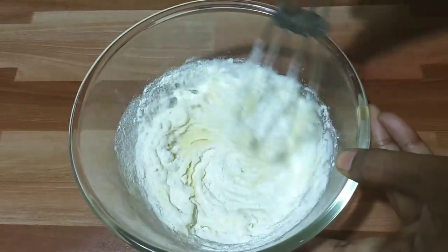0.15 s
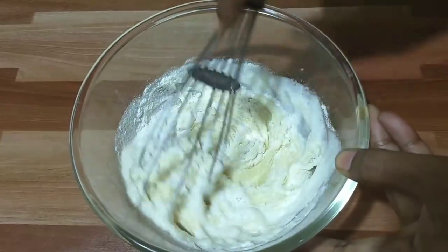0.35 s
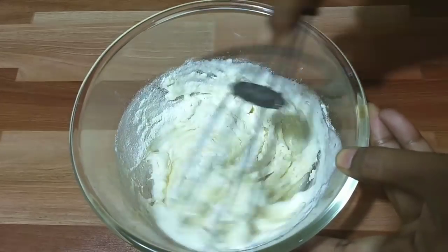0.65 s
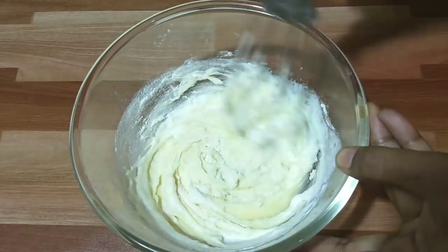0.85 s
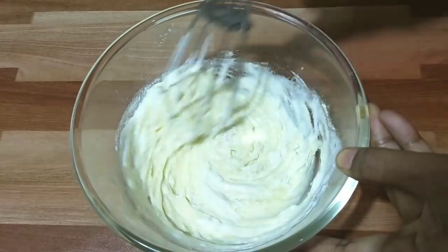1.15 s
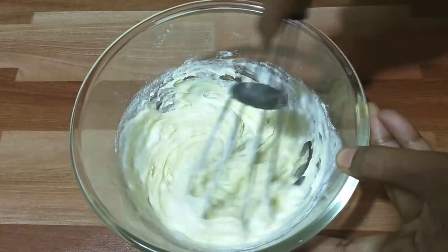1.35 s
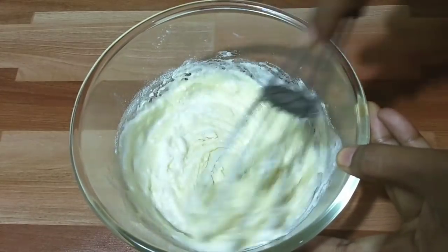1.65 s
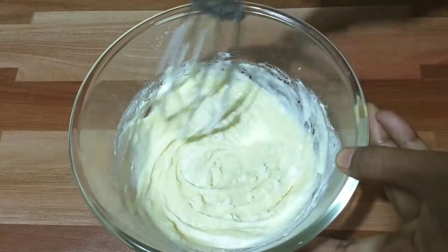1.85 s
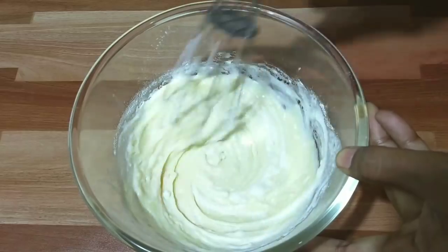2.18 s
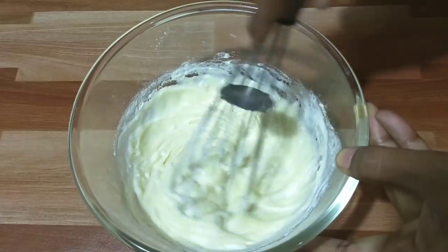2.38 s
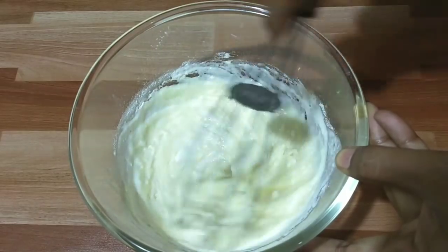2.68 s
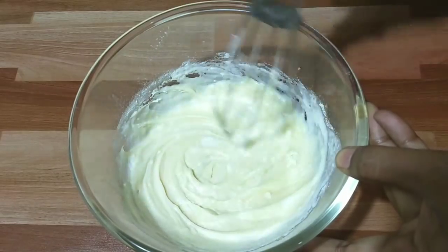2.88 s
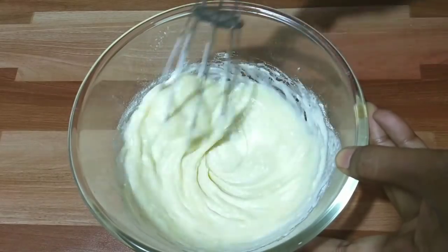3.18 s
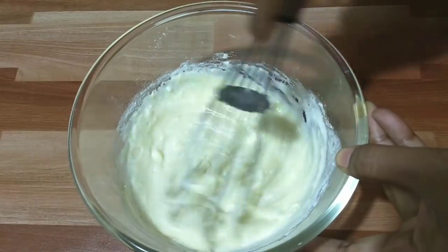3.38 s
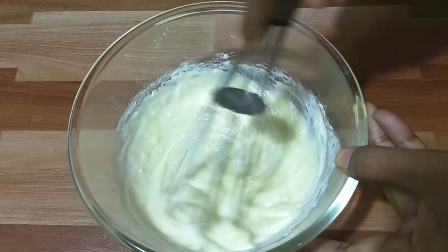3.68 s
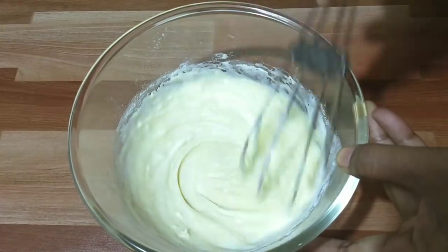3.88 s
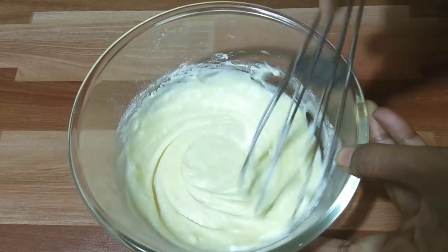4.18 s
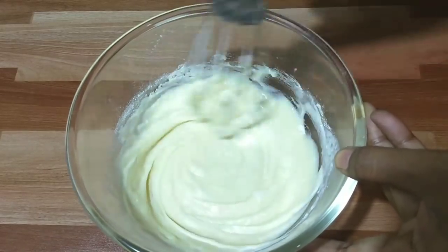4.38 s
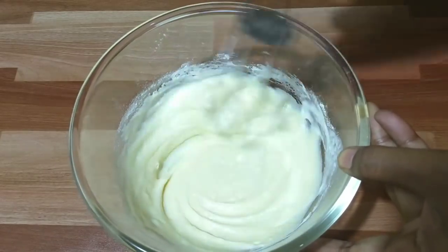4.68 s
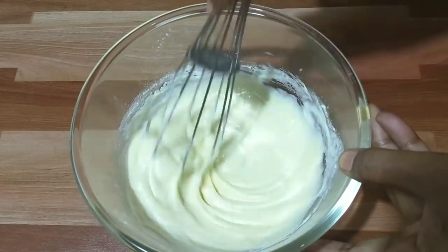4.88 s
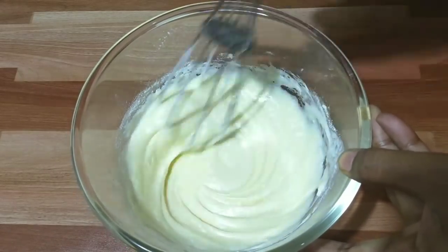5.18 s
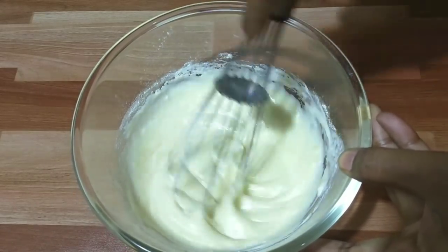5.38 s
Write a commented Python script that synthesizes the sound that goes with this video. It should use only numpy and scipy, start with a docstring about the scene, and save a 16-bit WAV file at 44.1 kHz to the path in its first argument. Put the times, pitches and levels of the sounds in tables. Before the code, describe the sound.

A wire whisk beats thick batter in a glass bowl for about five and a half seconds, heard close in wide stereo. It starts with light, irregular ticks and a dull tap over a faint grainy scrape and wet sloshing. Sharper wire clicks with brief glass clinks stand out at about 0.9, 1.6, 2 and 3 seconds. Between them come smaller rattles, muffled knocks, sticky snaps and little plops. From about 3.9 to 4.8 seconds the whisking is busiest, with dense clicks, stronger scraping and more squelching, then it carries on a little lighter to the end. The rocking bowl thumps softly on the wooden table now and then, most clearly near 1.4, 3.1 and 5.4 seconds. A quiet, wavering low hum and faint hiss fill the small kitchen throughout, and the hits leave a short echo.

```python
"""Whisking batter in a glass bowl

A wire whisk beats thick batter in a glass bowl on a wooden table, in a small, humming kitchen.
Wires scrape and click on the glass, which rings briefly, or knocks dully where batter damps it.
The batter sloshes, snaps and plops, and the rocking bowl thumps the table. Two microphones hear it
through a stereo widener, which subtracts a delayed copy of each channel from the other."""
import sys
import numpy as np
from scipy import signal
from scipy.fft import rfft, irfft
from scipy.io import wavfile
from scipy.ndimage import uniform_filter1d

SR = 44100
rng = np.random.default_rng(int(sys.argv[2]) if len(sys.argv) > 2 else 0)


def inscribe(sig):
    """Save sig as 16-bit PCM at rate SR to the path in sys.argv[1].

    A 1-D sig is mono; a 2-D sig holds one channel per row.
    Samples are clipped to [-1, 1] before scaling.
    """
    pcm = np.round(np.clip(np.atleast_2d(sig).T, -1, 1) * 32767)
    wavfile.write(sys.argv[1], SR, pcm.astype(np.int16))


N = 244573

# how loudly the whisk drags over glass and through batter: t/s, scrape level/dB, slosh level/dB
STROKE = [(0.0, -66, -67.5), (0.57, -58, -63.5), (0.93, -58, -58), (1.4, -59.5, -55.5), (1.62, -63.5, -67),
          (1.82, -56.5, -53.5), (2.3, -56, -55), (2.72, -60.5, -62.5), (3.32, -58, -57.5),
          (3.95, -63, -63.5), (4.15, -50.5, -56.5), (4.69, -61, -63), (4.88, -59, -61.5),
          (5.25, -55, -57.5), (5.55, -60, -53)]
# tone colour of wires scraping on glass: f/Hz, level/dB
SCRAPE_COLOUR = [(1200, -147), (2500, 8.5), (4000, -1), (6000, 2.5), (9000, 2.5), (11500, -1.5),
                 (13200, -4), (15300, -1), (15700, -36), (17000, -45)]
# tone colour of wet batter: f/Hz, level/dB
SLOSH_COLOUR = [(150, 0.5), (300, -1), (550, -2), (900, -0.5), (1400, -10.5), (2200, -13.5), (4000, -25.5)]
# low natural tones of bowl and table: f/Hz, level/dB, t60/s (the time to fade by 60 dB)
BOWL_TONES = [(257.7, 7.5, 0.093), (362, -13, 0.65), (498, 3, 0.17), (636, 2.5, 0.19), (874, -3.5, 0.28),
              (1183, -21, 0.1), (1758, 9.5, 0.036)]


def gain(db):
    """Turns decibels into a factor to multiply by."""
    return 10 ** (np.asarray(db) / 20)


def unit_level(x):
    """Scales a signal to an average (rms) level of 1."""
    return x / np.sqrt(np.mean(x ** 2) + 1e-20)


def noise(*shape):
    """White noise: an even hiss."""
    return rng.standard_normal(shape)


def wander(*shape, samples):
    """A random curve of rms 1, smoothed over the given number of samples."""
    return unit_level(uniform_filter1d(noise(*shape), size=samples))


def rise(t, seconds):
    """A soft start, climbing from 0 towards 1."""
    return 1 - np.exp(-t / seconds)


def fade(t, t60):
    """Dies away by 60 dB every t60 seconds."""
    return gain(-60 * t / t60)


def value_at(points, hz):
    """Reads between (frequency, value) points on a logarithmic frequency scale."""
    f, value = np.transpose(points)
    return np.interp(np.log(hz + 1), np.log(f + 1), value)


def coloured(x, colour):
    """Filters a sound by a list of (frequency, dB) points."""
    hz = np.fft.rfftfreq(x.shape[-1], 1 / SR)
    return irfft(rfft(x) * gain(value_at(colour, hz)), x.shape[-1])


def level_curve(table, column):
    """Turns a column of timed dB levels into a gain for every sample."""
    columns = np.transpose(table)
    return gain(np.interp(np.arange(N) / SR, columns[0], columns[column]))


def add(mix, start, sound):
    """Mixes a sound in at start seconds."""
    part = mix[:, max(round(start * SR), 0):][:, :sound.shape[1]]
    part += sound[:, :part.shape[1]]


def ringing(hz, db, t60, t):
    """Fading pure tones; the second channel gets each about a quarter cycle apart from the first."""
    first, offset = rng.random((2, len(hz), 1))
    phase = np.array([first, first + .15 + .2 * offset])
    tones = np.sin(2 * np.pi * (hz[:, None] * t + phase))
    return (gain(db[:, None]) * fade(t, t60[:, None]) * tones).sum(1)


def near_phase():
    """A random starting point in the cycle that both channels nearly share."""
    return rng.random() + .2 * rng.random((2, 1))


def ticks(per_s, step_db, max_steps):
    """Spikes at random times, each louder by a random, capped number of steps."""
    sizes = gain(step_db * np.minimum(rng.exponential(1, N), max_steps))
    return sizes * (rng.random(N) < per_s / SR)


def rattled(sound, t, t60, per_s, later=1.):
    """Repeats a sound for a wire's first contact and its fading, random later ones."""
    contacts = later * fade(t, t60) * (rng.random(len(t)) < per_s / SR) * noise(len(t))
    contacts[30] += 1
    return signal.fftconvolve(sound, contacts[None] / np.linalg.norm(contacts), axes=1)[:, :len(t)]


def background():
    """Broad room noise, a few fuzzy hums, and a low drone that wavers in pitch and level."""
    # tone colour of the room noise: f/Hz, level/dB
    air_colour = [(25, -59), (60, 7), (150, -1), (300, -7.5), (700, -16), (1500, -22.5), (4000, -26.5),
                  (9000, -28.5), (15300, -27.5), (15700, -57), (17000, -79)]
    # kitchen hums: f/Hz, width/Hz, level/dB
    hums = [(109.3, 11, -54), (117.9, 33, -51.5), (274, 43, -65)]
    # loudness of the drone: t/s, level/dB
    drone_levels = [(0.2, -71), (0.5, -41), (0.89, -62), (1.05, -46), (1.4, -51), (1.5, -38), (1.76, -57),
                    (1.9, -46), (2.18, -42.5), (2.5, -50), (2.8, -54), (3.18, -43), (3.9, -55), (4.2, -51),
                    (4.71, -62), (4.94, -44), (5.2, -59)]
    out = gain(-54) * unit_level(coloured(noise(2, N), air_colour))
    f = np.fft.rfftfreq(N, 1 / SR)
    for hz, width_hz, db in hums:
        hum = irfft(rfft(noise(2, N)) / (1 + (2 * (f - hz) / width_hz) ** 4), N)
        out += gain(db) * unit_level(hum)
    drone_hz = 48.8 + 2.0 * wander(2, N, samples=6000)
    drone = np.sin(2 * np.pi * np.cumsum(drone_hz, axis=1) / SR)
    return out + level_curve(drone_levels, 1) * drone


def wire_scrape():
    """Wires stick and slip on the glass, making a grainy hiss that swells unevenly."""
    slips = ticks(per_s=700, step_db=4.0, max_steps=4)
    grain = np.sqrt(signal.oaconvolve(slips ** 2, np.exp(-np.arange(400) / 60.))[:N].clip(0))
    hiss = noise(2, N) * (1 + 5.0 * unit_level(grain))
    swell = gain(2.0 * wander(N, samples=2500))
    return level_curve(STROKE, 1) * swell * unit_level(coloured(hiss, SCRAPE_COLOUR))


def batter_slosh():
    """Batter sloshes in lumps, with small pops, and sets the bowl's low tones ringing."""
    lumps = gain(6.6 * wander(N, samples=500))
    wet = noise(2, N) * lumps
    hz, db, t60 = np.transpose(BOWL_TONES)
    bowl = signal.oaconvolve(wet, ringing(hz, db, t60, np.arange(6000) / SR), axes=1)[:, :N]
    slosh = unit_level(coloured(wet, SLOSH_COLOUR))
    return level_curve(STROKE, 2) * (slosh + gain(-3) * unit_level(bowl) + gain(-15) * bubble_pops())


def bubble_pops():
    """Small air pockets burst in the batter: a few cycles each, gliding up."""
    out, t = np.zeros((2, N)), np.arange(1200) / SR
    for hz in np.geomspace(450, 2200, num=12):
        bursts = ticks(per_s=5.0, step_db=3.0, max_steps=2.5)
        tone = np.sin(2 * np.pi * (hz * t * (1 + 10.0 * t) + rng.random((2, 1))))
        pop = tone * np.exp(-t * hz / 1.1) * rise(t, 0.00018)
        out += signal.oaconvolve(bursts[None], pop * 700 / hz, axes=1)[:, :N]
    return unit_level(out)


def sticky_snaps():
    """Batter tears from the wires in clumps of tiny, high snaps."""
    out, t = np.zeros((2, N)), np.arange(300) / SR
    clumps = gain(6.0 * wander(N, samples=900) - 2)
    for hz in np.geomspace(2500, 13000, num=10):
        tears = ticks(per_s=18 * clumps, step_db=4.0, max_steps=4)
        tone = np.sin(2 * np.pi * (hz * t + rng.random((2, 1))))
        snap = tone * np.exp(-t * hz / 4.6) * rise(t, 0.00025)
        out += signal.oaconvolve(tears[None], snap / np.linalg.norm(snap), axes=1)[:, :N]
    return level_curve(STROKE, 1) * gain(-15) * unit_level(coloured(out, SCRAPE_COLOUR))


def wire_clicks():
    """Several wires land almost together and rattle on: an uneven crack with short wire tones."""
    # wires landing on the bowl wall: t/s, level/dB, treble lift/dB, rattle t60/s
    landings = [(0.091, -47.5, -1, 0.014), (0.239, -28.5, -32, 0.0062), (0.326, -47, -9, 0.2),
                (0.403, -45, -9, 0.043), (0.4537, -42.5, -22, 0.013), (0.5567, -41.5, -13, 0.0089),
                (0.624, -35, -5, 0.014), (0.6483, -42.5, -24, 0.051), (0.726, -48, 8, 0.013),
                (0.806, -42, -7, 0.058), (0.846, -38.5, 1, 0.0097), (0.904, -20.5, 4, 0.02),
                (0.909, -28, 7, 0.0098), (0.9373, -37, 4, 0.014), (0.948, -29.5, -3, 0.015),
                (1.113, -43.5, -12, 0.019), (1.2292, -40, -1, 0.021), (1.296, -36, -5, 0.016),
                (1.3045, -32.5, -8, 0.02), (1.398, -43, -13, 0.044), (1.511, -44, -5, 0.012),
                (1.621, -30, 2, 0.021), (1.659, -29, -19, 0.0046), (1.6701, -34, -5, 0.041),
                (1.7152, -34, 0, 0.034), (1.764, -40, 2, 0.026), (1.779, -40.5, -6, 0.067),
                (1.8424, -38.5, 2, 0.03), (1.9052, -43.5, 3, 0.063), (1.9771, -27, 7, 0.052),
                (1.996, -45, -2, 0.042), (2.004, -33, 4.5, 0.079), (2.073, -35.5, -7, 0.07),
                (2.0849, -33.5, -3, 0.035), (2.203, -44.5, -3, 0.18), (2.332, -29, -8, 0.0098),
                (2.4013, -40, -1, 0.022), (2.646, -27.5, -4, 0.014), (2.802, -46, -7, 0.065),
                (2.814, -33, -2, 0.038), (2.9553, -21.5, 9, 0.011), (3.194, -43.5, -16, 0.04),
                (3.3294, -36.5, -3, 0.1), (3.428, -39.5, -6, 0.038), (3.5385, -31, 2.5, 0.018),
                (3.631, -37, -2, 0.026), (3.649, -34, -13, 0.024), (3.689, -36.5, -11, 0.04),
                (3.716, -39, -9, 0.057), (3.833, -42.5, 0, 0.082), (3.946, -22.5, -10, 0.025),
                (3.9675, -20.5, -2, 0.017), (4.0648, -30.5, 7, 0.0084), (4.1005, -38.5, -6, 0.15),
                (4.1962, -25, 3, 0.015), (4.226, -38, 0, 0.012), (4.2186, -24, -4, 0.0073),
                (4.252, -24.5, -5, 0.014), (4.348, -28.5, -6, 0.037), (4.4709, -31.5, -10, 0.035),
                (4.4925, -30.5, -3, 0.016), (4.5024, -29.5, -11, 0.019), (4.5337, -22, -3, 0.013),
                (4.558, -45, -22, 0.054), (4.6239, -34, -7, 0.03), (4.66, -40, -9, 0.07),
                (4.71, -42.5, -6, 0.082), (4.783, -29, -5, 0.032), (4.801, -32, 7, 0.013),
                (4.987, -36, -4, 0.04), (5.034, -34, 4, 0.023), (5.055, -38.5, -12, 0.035),
                (5.091, -26.5, 2, 0.023), (5.188, -39, -14, 0.024), (5.2227, -38.5, -5, 0.017),
                (5.329, -31, -2, 0.028), (5.426, -33, -7, 0.027), (0.182, -50, -25, .01),
                (0.199, -45, -27, .008), (0.224, -44, 4, 0.012), (0.273, -43.5, -7, 0.024),
                (0.53, -51, -4, .01), (0.5974, -46, -6, 0.0093), (0.7867, -40, -3, 0.0092),
                (0.8862, -57, 2, 0.0064), (0.894, -47, 3, 0.0056), (1.1813, -45.5, -19, 0.0069),
                (1.571, -42, -10, 0.019), (1.729, -34.5, -14, .01), (2.984, -39, 3, .02),
                (2.2825, -42, 15, 0.01), (2.3087, -59, 15, 0.0065), (2.553, -46.5, -31, 0.011),
                (2.907, -51, -15, 0.018), (3.521, -41.5, 4, 0.0088), (3.7943, -41, -13, 0.015),
                (3.8731, -40, -1, 0.02), (4.2014, -30, -3, 0.017), (4.212, -55, 10, 0.0089),
                (4.256, -30, -13, 0.0099), (4.343, -28, 2, 0.019), (4.356, -45, 5, 0.014),
                (4.477, -42, 0, .01), (4.543, -43, 3, 0.017), (4.554, -30, -20, 0.017),
                (4.643, -37, -3, 0.02), (5.2452, -38, 0, 0.018), (5.315, -38, -2, 0.0095)]
    # tone colour of the crack: f/Hz, level/dB
    crack_colour = [(300, -0.5), (1000, 2.5), (2500, 2.5), (5000, 4.5), (9000, 9), (11000, 2), (13200, 2.5),
                    (15200, -2), (16000, -35), (17000, -44)]
    # natural tones of the wires, damped by batter: f/Hz, level/dB, t60/s
    wire_tones = [(3500, -3, .018), (4400, -3, .018), (6450, -4, .015), (8600, -1, .02), (8790, -1, .02),
                  (9450, -1, .022), (10720, -3, .018), (12700, -3, .02), (13400, -5, .018),
                  (15050, 0, .018)]
    out, t = np.zeros((2, N)), np.arange(6144) / SR
    hz, db, t60 = np.transpose(wire_tones)
    for start, level_db, treble_db, rattle_s in landings:
        rattle_s = max(rattle_s, .005)
        fall = gain(-1.5) * fade(t, 0.0083) + fade(t, rattle_s) + gain(-14.5) * fade(t, 0.056)
        bumps = gain(4.0 * rise(t, .004) * wander(len(t), samples=60))
        tilt = [(4000, 0), (14500, treble_db)]
        hiss = unit_level(coloured(coloured(noise(2, len(t)), crack_colour), tilt))
        crack = hiss * rise(t, 0.0012) * fall * bumps
        detune, spread_db = .025 * noise(len(hz)), 5.0 * noise(len(hz))
        tones = ringing(hz * (1 + detune), db + value_at(tilt, hz) + spread_db, t60, t)
        tones = rattled(tones, t, rattle_s, per_s=1800)
        add(out, start - .0006, gain(level_db) * (gain(-0.5) * crack + gain(-23) * tones))
    return out


def bowl_knocks():
    """A thud rings the bowl tones nearest its pitch; batter squelches and an air pocket glides up."""
    # dull knocks of the batter-filled bowl: t/s, level/dB, base pitch/Hz
    knocks = [(0.242, -42.5, 912), (0.328, -40, 1290), (0.621, -46, 612), (0.795, -44.5, 1450),
              (0.904, -43, 656), (0.946, -34, 857), (1.646, -38, 615), (1.704, -42.5, 547),
              (1.765, -38, 887), (1.806, -41.5, 610), (2.005, -36.5, 897), (2.035, -39, 950),
              (2.072, -38, 1300), (2.087, -36, 594), (2.139, -39.5, 805), (2.33, -37.5, 838),
              (2.645, -32, 571), (2.802, -36.5, 870), (2.903, -49, 1040), (2.956, -34.5, 1350),
              (3.095, -43.5, 740), (3.194, -54, 880), (3.211, -41, 465), (3.332, -51, 1410),
              (3.432, -44, 630), (3.518, -40.5, 428), (3.535, -35.5, 604), (3.647, -39.5, 716),
              (3.793, -40.5, 467), (3.945, -31, 630), (3.965, -36, 518), (4.065, -41.5, 493),
              (4.102, -38, 622), (4.196, -43, 880), (4.216, -37, 990), (4.252, -34.5, 627),
              (4.343, -32.5, 1044), (4.386, -38.5, 587), (4.47, -40.5, 682), (4.491, -37.5, 670),
              (4.552, -39, 1340), (4.628, -34.5, 538), (4.66, -38, 910), (4.713, -45.5, 1150),
              (4.782, -40.5, 787), (4.801, -35, 714), (4.891, -44.5, 483), (5.036, -41.5, 910),
              (5.054, -40.5, 808), (5.09, -42.5, 755), (5.188, -35.5, 845), (5.219, -38, 880),
              (5.326, -36, 850), (5.426, -36, 906)]
    out, t = np.zeros((2, N)), np.arange(8192) / SR
    hz, db, t60 = np.transpose(BOWL_TONES)
    for start, level_db, pitch_hz in knocks:
        shift = 1 + .03 * noise(len(hz))  # moving batter retunes the bowl from blow to blow
        octaves_away = abs(np.log2(hz / pitch_hz))
        body = gain(-12.5) * ringing(hz * shift, db - 3.4 * octaves_away, t60, t)
        squelch = gain(0.5) * unit_level(coloured(noise(2, len(t)), SLOSH_COLOUR)) * fade(t, 0.049)
        pocket = np.sin(2 * np.pi * (pitch_hz * t * (.92 + 4.02 * t) + near_phase())) * fade(t, 0.053)
        thud = gain(1.5) * np.sin(2 * np.pi * (1.2 * pitch_hz * t + near_phase())) * fade(t, 0.011)
        add(out, start, gain(level_db) * thud * rise(t, 0.0006))
        add(out, start - .001, gain(level_db) * (body + squelch + pocket) * rise(t, 0.0031))
    return out


def table_thumps():
    """The bowl rocks and sends low, soft blows through the table top."""
    # blows on the table: t/s, level/dB, f/Hz, t60/s
    thumps = [(0.547, -39, 61.3, 0.13), (0.916, -44.5, 114, 0.88), (1.402, -34, 123.3, 0.27),
              (1.618, -40, 105.7, 0.47), (2.378, -47.5, 351.2, 0.56), (3.106, -33, 119, 0.22),
              (5.218, -38, 251, 0.17), (5.43, -30, 118.6, 0.33), (5.457, -30, 255, 0.056)]
    out, t = np.zeros((2, N)), np.arange(12000) / SR
    for start, db, hz, t60 in thumps:
        tone = ringing(np.array([hz]), np.array([db]), np.array([t60]), t)
        add(out, start, tone * rise(t, 0.0011))
    return out


def batter_plops():
    """An air pocket closes with a soft, wobbling tone that rises as the pocket shrinks."""
    # air pockets closing in the batter: t/s, level/dB, base pitch/Hz
    plops = [(0.705, -50, 578), (1.105, -49.5, 529), (1.402, -47, 868), (2.204, -49, 466),
             (2.359, -41, 1650), (2.415, -45.5, 1200), (2.497, -58, 970), (2.44, -45.5, 1590),
             (2.747, -49.5, 456), (2.826, -43, 1390), (2.84, -49, 494), (2.955, -46, 930),
             (3.193, -48, 890), (3.341, -46, 527), (3.366, -49, 484), (3.574, -48.5, 680),
             (3.647, -45, 1770), (3.693, -46.5, 624), (3.961, -27.5, 1785), (4.056, -42, 940),
             (4.102, -41, 1410), (4.116, -43, 870), (4.144, -39.5, 1710), (4.212, -42.5, 646),
             (4.246, -49, 940), (4.247, -47, 1786), (4.275, -45, 1280), (4.34, -46, 535),
             (4.489, -40, 1414), (4.505, -38, 630), (4.532, -43.5, 853), (4.621, -36.5, 1030),
             (4.682, -50, 610), (4.799, -31.5, 1734), (4.844, -48, 483), (5.053, -49, 495),
             (5.086, -47, 1410), (5.127, -45.5, 615), (5.24, -47, 523), (5.277, -49.5, 537),
             (5.373, -48, 482)]
    ring_cycles = 36.3
    out, t = np.zeros((2, N)), np.arange(4096) / SR
    for start, level_db, pitch_hz in plops:
        wobble = gain(3.0 * wander(len(t), samples=90))
        tone = np.sin(2 * np.pi * (pitch_hz * t * (.97 + 2.46 * t) + near_phase()))
        loudness = 2 * gain(level_db) * rise(t, 0.0042) * fade(t, ring_cycles / pitch_hz)
        add(out, start, loudness * wobble * tone)
    return out


def glass_clinks():
    """Waves ring around the rim, loudest when struck near a crest; loose wires roughen the ring."""
    # blows on bare glass: t/s, level/dB, angle around the rim from the microphones/degrees,
    # share of the ring time that the batter leaves (0-1), level of the top tones/dB
    blows = [(0.902, -28.5, 90, 0.82, -7), (0.938, -41, 65, 1.0, -7), (1.303, -46, 39, 0.46, 0),
             (1.6205, -34, 49.7, 0.95, 11), (1.768, -52, 39, 1, 0), (1.978, -30, 47.5, 0.8, -3),
             (2.003, -39, 54, 0.8, 0), (2.007, -38.5, 64, 1, 0), (2.817, -47.5, 38, 0.64, 0),
             (2.9546, -29, 78.6, 0.94, -8), (3.3277, -40.5, 50.7, 0.6, -4), (3.967, -52, 51, 0.5, 5),
             (4.195, -43, 37, 0.4, 18), (4.217, -54, 48, 0.2, 12), (4.248, -37, 33, 0.34, 3),
             (4.344, -54, 40.4, 0.7, 8), (4.491, -47, 63, 0.4, 10), (4.5, -47, 75, 0.3, 23),
             (4.532, -38, 25, 0.13, 21), (4.63, -46.5, 34, 0.5, 3), (4.641, -54, 45, 0.7, 16),
             (4.784, -44, 47, 0.5, 10), (5.0905, -40.5, 38.4, 0.47, 10)]
    # natural tones of the glass, many in close pairs: f/Hz, level/dB, t60/s
    glass_tones = [(2640, -8, .04), (4030, -3, .035), (4075, -3, .06), (5300, -6, .02), (5560, -4, .02),
                   (5780, -3, .05), (5820, 0, .11), (7745, -2, .04), (7782, 0, .06), (9920, -2, .045),
                   (9992, 3, .11), (12780, -5, .04), (15050, 0, .03), (15230, 0, .025)]
    rim_hz, top_hz = 158, 14000
    out, t = np.zeros((2, N)), np.arange(8192) / SR
    hz, db, t60 = np.transpose(glass_tones)
    waves = np.round(np.sqrt(hz / rim_hz))  # how many waves fit around the rim for each tone
    tilt_db = -4 * (waves - waves.mean())  # tones with more waves are quieter
    for start, level_db, angle, ring_left, top_db in blows:
        buzz = gain(5.5 * wander(2, len(t), samples=100))
        crest_db = 40 * np.log10(abs(np.cos(waves * np.radians(angle))) + 0.1)
        strike_db = level_db + np.where(hz > top_hz, top_db, crest_db)
        detuned_hz = hz * (1 + 0.00086 * noise(len(hz)))
        tones = ringing(detuned_hz, db + strike_db + tilt_db, t60 * np.clip(ring_left, .2, 1), t)
        ring = buzz * rattled(tones, t, t60=0.01, per_s=250, later=.35)
        add(out, start, ring * np.linalg.norm(tones) / np.linalg.norm(ring))
    return out


def kitchen_echo(x):
    """Many small echoes blend into a tail whose high notes die first."""
    # how long the kitchen rings: f/Hz, t60/s
    ring_times = [(250, 0.97), (1000, 0.57), (4000, 0.44), (12000, 0.31)]
    echoes = np.zeros((2, SR // 2))
    arrivals = np.arange(200, SR // 2 - 20, 20) + rng.integers(0, 20, (2, (SR // 2 - 201) // 20))
    np.put_along_axis(echoes, arrivals, rng.choice([-1., 1.], arrivals.shape), 1)
    hz, t, bands = signal.stft(echoes, SR, nperseg=256)
    tail = signal.istft(bands * fade(t, value_at(ring_times, hz)[:, None]), SR, nperseg=256)[1]
    return signal.fftconvolve(x, tail / np.linalg.norm(tail[0]), axes=1)[:, :N]


def scene():
    """Whisk, bowl and room, blended so that the two microphones hear nearly the same bass."""
    # how alike the two microphones sound: f/Hz, likeness (0-1)
    likeness = [(60, 1), (200, 0.92), (450, 0.71), (700, 0.21), (1200, 0.03), (2500, 0.072), (15000, 0.019)]
    # the right microphone's level against the left: f/Hz, level/dB
    right_balance = [(60, -1), (400, -2.5), (1000, -2), (2000, -3.5), (12000, -3.5)]
    hits = wire_clicks() + glass_clinks() + bowl_knocks() + batter_plops() + table_thumps()
    echo = gain(-5.5) * kitchen_echo(hits)
    stirring = wire_scrape() + batter_slosh() + sticky_snaps()
    left, other = rfft(hits + echo + stirring + background())
    hz = np.fft.rfftfreq(N, 1 / SR)
    same = value_at(likeness, hz)
    right = (same * left + np.sqrt(1 - same ** 2) * other) * gain(value_at(right_balance, hz))
    return irfft(np.array([left, right]), N)


def record(dry):
    """The widener takes a delayed share of each channel from the other; the top treble is then cut."""
    # strength of the delayed copy: f/Hz, share (0-1)
    copy_share = [(2500, .86), (5000, .8), (12000, .76)]
    delay_s, cutoff_hz = 18.9 / SR, 16900
    spectrum = rfft(dry, N + 64)
    hz = np.fft.rfftfreq(N + 64, 1 / SR)
    delayed = spectrum[::-1] * np.exp(-2j * np.pi * hz * delay_s)
    wide = irfft(spectrum - value_at(copy_share, hz) * delayed, N + 64)[:, :N]
    low_pass = signal.firwin(511, cutoff_hz, window=("kaiser", 9), fs=SR)
    return signal.oaconvolve(wide, low_pass[None], "same")


dry = scene()
out = record(dry)
inscribe(out)
```